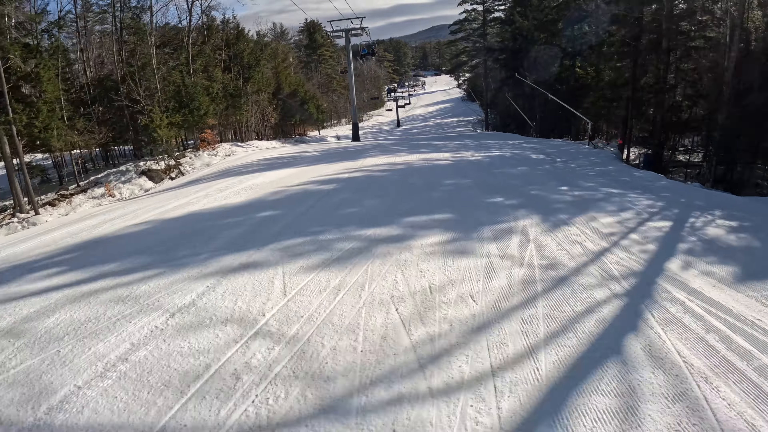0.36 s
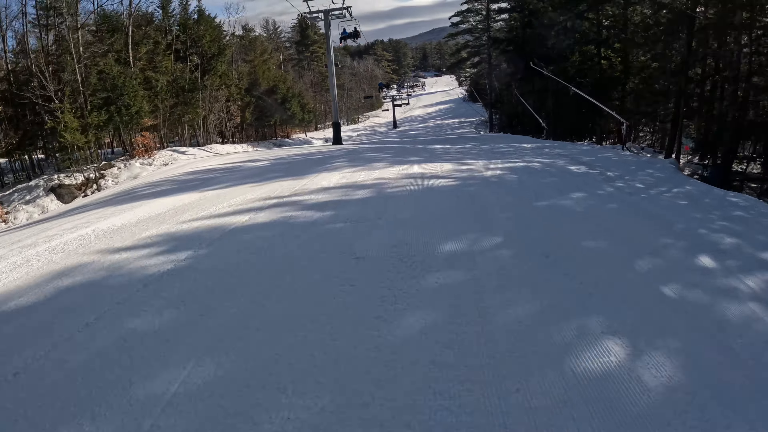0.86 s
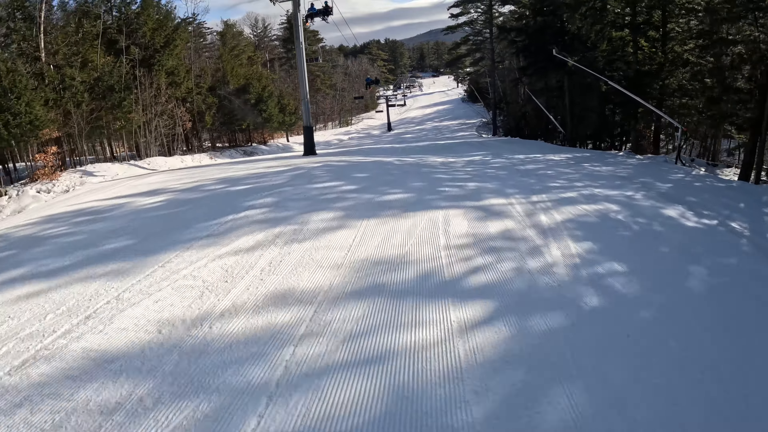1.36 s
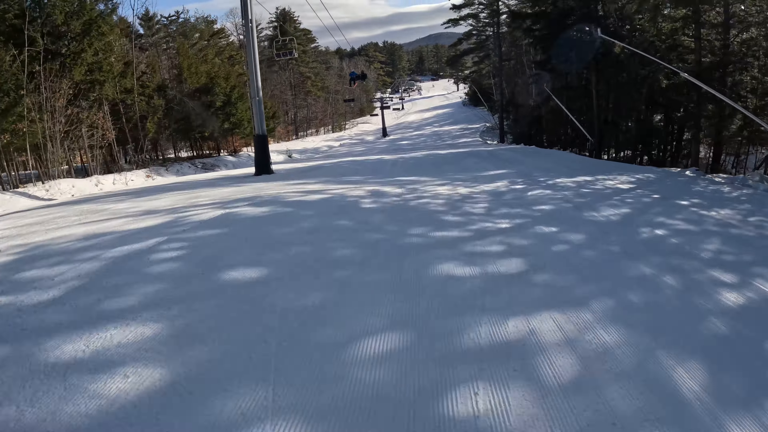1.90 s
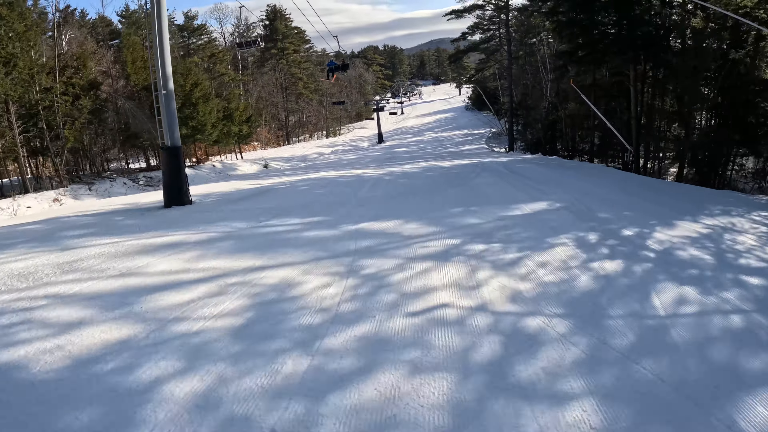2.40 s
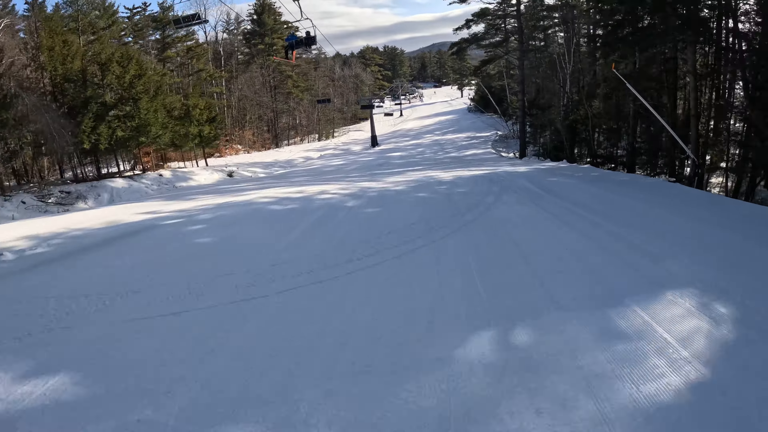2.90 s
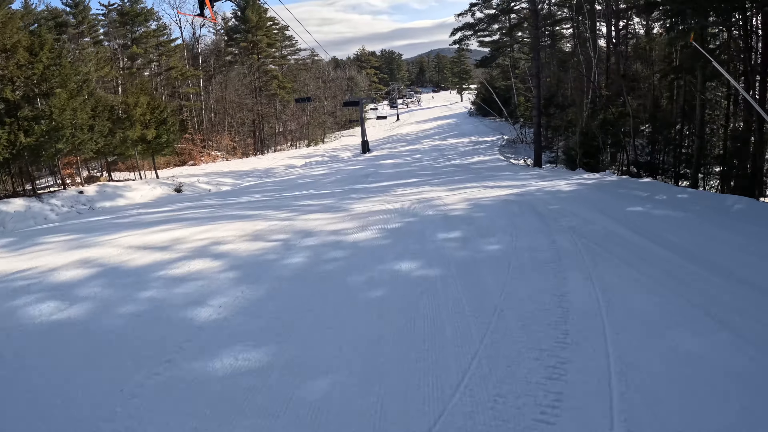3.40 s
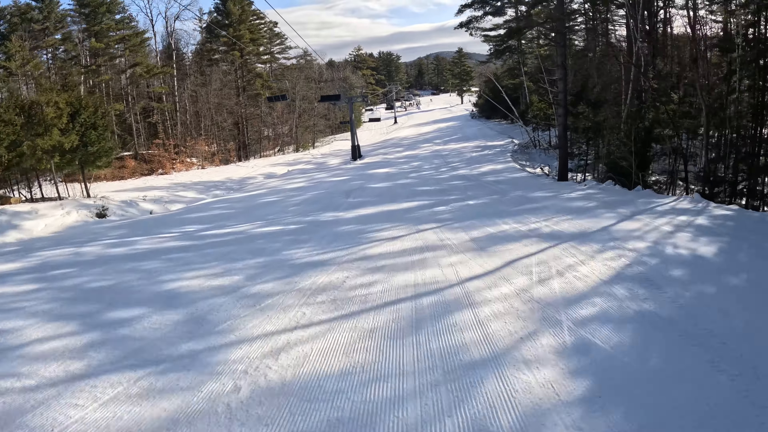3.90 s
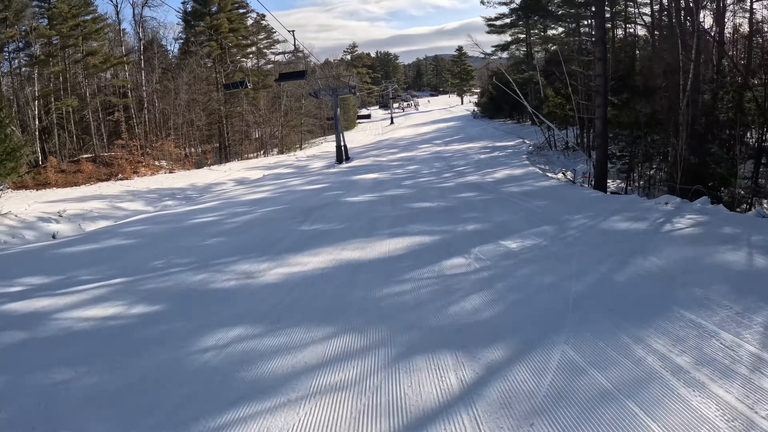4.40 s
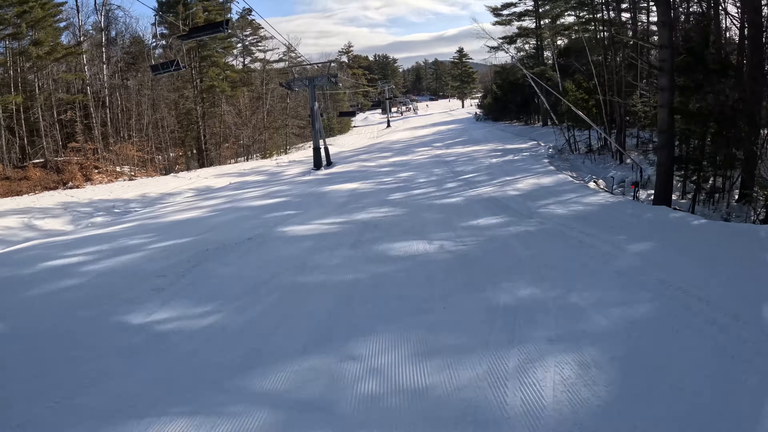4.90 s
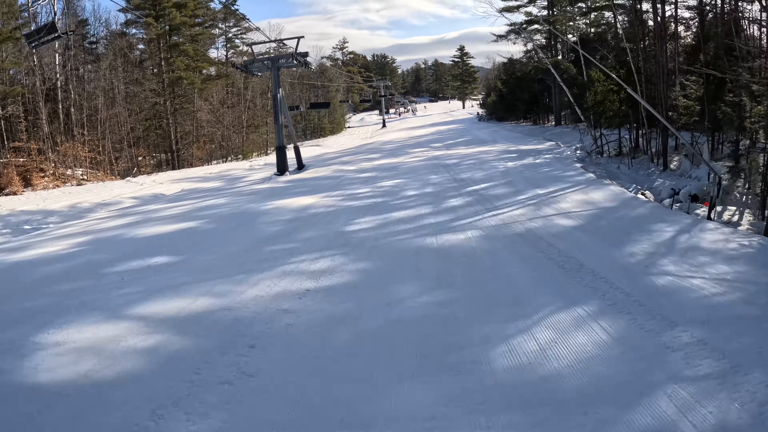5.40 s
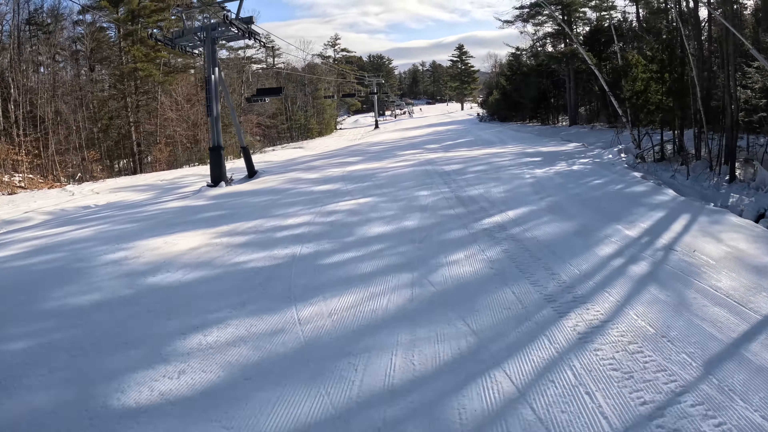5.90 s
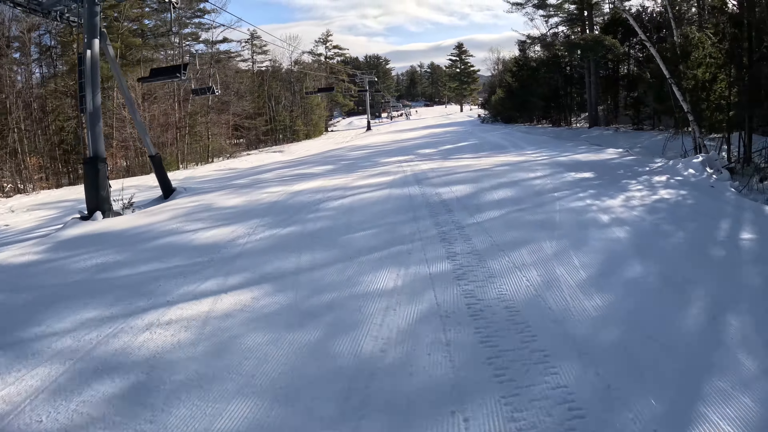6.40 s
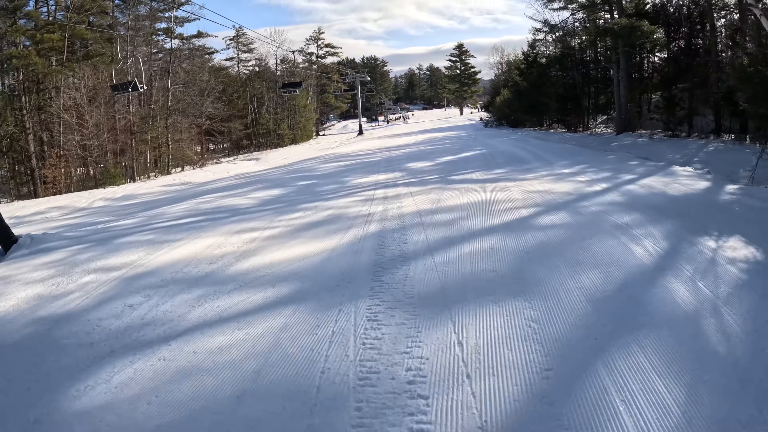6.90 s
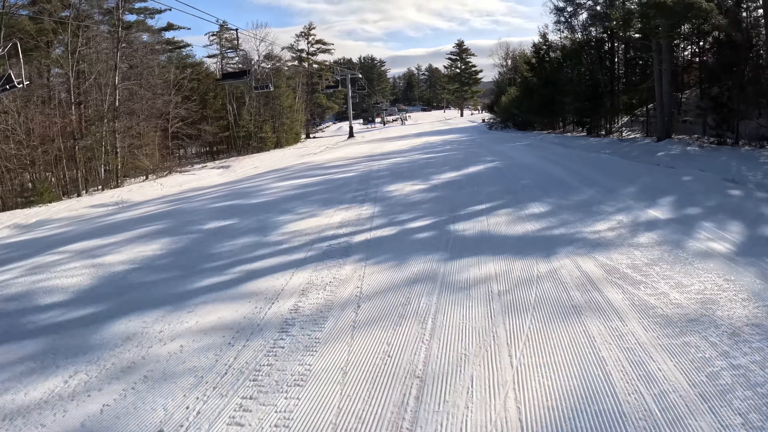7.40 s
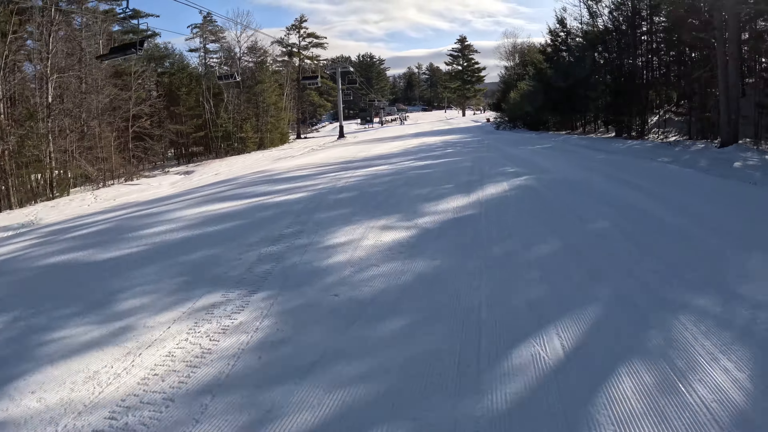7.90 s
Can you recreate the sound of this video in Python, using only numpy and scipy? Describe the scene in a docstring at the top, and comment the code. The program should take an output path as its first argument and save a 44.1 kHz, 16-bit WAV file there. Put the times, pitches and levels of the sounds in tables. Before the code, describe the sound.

Skis carve fast down firm groomed snow outdoors, heard from a microphone worn on the skier. A loud, bright grinding scrape opens, followed by several strong bites with little slaps and hissing spray. A longer scrape comes around three seconds, then the edgings grow softer while low wind thumps and flutters unevenly throughout.

```python
"""Carving skis in the wind

A skier carves down firm groomed snow with the microphone on the body.
The steel edges crush snow grains: random impulses ring the skis' resonances and make a filtered crunch.
Hissing spray is finer grain noise that partly follows the edges' judder; short bursts slap over ridges.
The airstream buffets the microphone: three bands of noise thump, flutter and rush, their levels shifted by gusts."""
import sys
import numpy as np
from scipy import signal
from scipy.fft import rfft, irfft, next_fast_len
from scipy.io import wavfile
from scipy.ndimage import uniform_filter1d

SR = 44100
rng = np.random.default_rng(int(sys.argv[2]) if len(sys.argv) > 2 else 0)


def gain_from_decibels(decibels):
    """Convert decibel values to linear amplitude factors."""
    exponent = np.asarray(decibels, float) / 20
    return 10 ** exponent


def bounce(signal):
    """Save signal as a 16-bit WAV file at the path given by the first command-line argument."""
    frames = np.transpose(np.atleast_2d(signal))
    limited = np.clip(frames, -1, 1)
    pcm = np.round(limited * 32767).astype(np.int16)
    wavfile.write(sys.argv[1], SR, pcm)


N = 354119  # samples

# the snow under the skis: start_s, iciness as upper against lower scrape_db, loose powder as extra spray_db
SNOW = [(0, 11, 2.5), (.6, 6, 3), (1.0, 3, 1), (1.6, -3, -0.5), (2.1, 2, -1.5), (2.6, -5, 0.1),
        (3.0, -1, 2), (3.4, 1, 2.5), (4, 7, 1), (4.6, -0.5, -1.5), (5.5, -4, -0.5), (6.2, 1, -1),
        (6.7, -9, 0), (7.3, 4, 0.5), (8.03, 2, 0.5)]


def carving():
    """The loaded edge grips and judders through the snow, scraping, slapping and throwing spray."""
    bite_db = edge_bite()
    ice_db, powder_db = in_time(SNOW)
    bite_swing_db = bite_db - bite_db.mean()
    # a loaded edge runs steadier: it loses this share of the judder per dB of bite
    looseness = np.clip(1.0 - 0.06 * bite_swing_db, .2, 1.5)
    judder_db = looseness * (0.7 * drift(37) + 1.04 * drift(45))
    grip = rms_one(gain_from_decibels(judder_db)) * gain_from_decibels(bite_db)
    body = scrape(looseness, ice_db)
    return grip * body + slaps(body) + spray(bite_swing_db, powder_db, judder_db)


# an edge is set and held: full_bite_s, hold_s, bite_db, build_db_per_s
EDGINGS = [(0.06, 0.27, -23.5, 47), (.5, 0.056, -35.5, 60), (0.837, 0.17, -29.5, 50),
           (1.073, 0.23, -25.5, 38), (1.414, 0.048, -39.5, 88), (2.054, 0.053, -40, 23),
           (2.2, 0.14, -35.5, 46), (2.585, 0.027, -33.5, 55), (2.993, 0.58, -33.5, 40),
           (4.266, 0.35, -38, 35), (4.683, 0.22, -34, 23), (4.946, 0.17, -36, 34), (5.294, 0.2, -41, 33),
           (5.877, 0.12, -42.5, 43), (6.24, 0.11, -41, 43), (6.828, 0.08, -39, 300),
           (7.343, 0.059, -37.5, 81), (7.63, 0.5, -37.5, 25)]
RELEASE_DB_PER_S = 64
GLIDE_DB = -42  # flat skis between edgings


def edge_bite():
    """Each edging builds, holds and is released; its power adds to that of the glide; dB."""
    t = np.arange(N) / SR
    power = gain_from_decibels(2 * GLIDE_DB)
    for full_s, hold_s, level_db, build in EDGINGS:
        building_db = build * np.maximum(full_s - t, 0)
        released_db = RELEASE_DB_PER_S * np.maximum(t - full_s - hold_s, 0)
        power = power + gain_from_decibels(2 * (level_db - building_db - released_db))
    return 10 * np.log10(power)


# spectrum of the crushed snow: pitch_hz, density_db (relative)
CRUNCH = [(500, -10.5), (900, -5), (1400, -8.5), (2500, -16), (3700, -19), (4400, -27.5), (6000, -53)]
# how freely the ski rings: start_s, shift of ringing against crunch_db
RINGING = [(0, 3.5), (.6, 0), (1.1, -0.5), (2.1, -3.5), (3.0, -3), (3.6, 1), (4.6, -0.5), (5.5, -6),
           (6.5, 3), (6.85, 2.5), (7.15, 0.5), (8.03, -6.5)]


def scrape(looseness, ice_db):
    """Breaking grains ring the ski and crunch; harder snow under the edge scrapes brighter."""
    ringing = rms_one(ski_ring(grains(3.8)))
    crunch = coloured(grains(3.1), CRUNCH) * rms_one(gain_from_decibels(0.93 * looseness * drift(19)))
    free_db, = in_time(RINGING)
    mix = gain_from_decibels(free_db / 2 - 3.5) * ringing + gain_from_decibels(-free_db / 2 - 1.5) * crunch
    return evened(tilted(mix, 2450, ice_db), 0.07, 0.1)


# what the skis ring with: pitch_hz, width_hz, level_db (relative)
SKI = [(1085, 45, 0.5), (1193, 42, 5), (1540, 68, -6.5), (1639, 37, 1), (1975, 91, -4.5), (2184, 156, -6.5),
       (2574, 174, -12.5), (2935, 130, -9.5), (3330, 230, -14.5), (3750, 300, -15), (5040, 250, -18.5)]
MODE_WANDER_DB = 1.3  # the contact moves along the edge and favours other modes


def ski_ring(force):
    """The ski's resonances in parallel, signs alternating, each driven more or less as the contact wanders."""
    out = np.zeros(N)
    for k, (hz, width, level_db) in enumerate(SKI):
        r = np.exp(-np.pi * width / SR)
        poles = [1, -2 * r * np.cos(2 * np.pi * hz / SR), r * r]
        zeros = [(1 - r * r) / 2, 0, (r * r - 1) / 2]  # about unity gain at the peak
        drive = force * rms_one(gain_from_decibels(MODE_WANDER_DB * drift(19)))
        out += (-1) ** k * gain_from_decibels(level_db) * signal.lfilter(zeros, poles, drive)
    return out


GRAINS_PER_S = 9000


def grains(spread_db):
    """Snow crystals break at random, most small and a few large."""
    sizes = gain_from_decibels(spread_db * np.minimum(rng.exponential(1, N), 5)) * rng.choice([-1, 1], N)
    return rms_one(sizes * (rng.random(N) < GRAINS_PER_S / SR))


# a ski slaps over a ridge: start_s, level_db (relative), brightness_db (added to the top, taken from the bottom)
SLAPS = [(0.439, -7, -2), (0.5112, -13, -8), (0.5354, -10, 2), (1.1797, -12.5, -14), (1.276, -19, -5),
         (1.3204, -19, 3), (1.41, -12, -8), (1.4525, -11, -8), (1.5574, -19, 12), (2.1894, -18, -12),
         (2.2228, -20.5, -13), (2.267, -16, -10), (2.4862, -17, 0), (2.6314, -20, 4), (2.6524, -20, -11),
         (2.8789, -14, -8), (3.004, -13, -2), (3.034, -9, -2), (3.1123, -15, 1), (3.175, -16, 7),
         (3.2236, -13, 0), (3.2585, -15, -2), (3.3994, -14, 7), (3.449, -26, 3), (3.5019, -18, 4),
         (3.5807, -23, 3), (4.6922, -18, -8), (4.7366, -21, 0), (5.05, -16, -11), (5.12, -17, 6),
         (6.665, -25, -10), (6.7507, -24, 4), (6.8034, -17, -7), (6.9706, -18, -6), (7.004, -23, -9),
         (7.11, -27, -10), (7.229, -15, 2), (7.32, -19, 2), (7.42, -15, -9), (7.436, -14, -1)]
SLAP_FALL_S = 0.0059
SLAP_SCRAPE_SHARE = 0.65  # scrape against the squall
KNOCK_DB = 15  # drive of the ringing against the squall


def slaps(body):
    """Each slap is a squall of scrape that also sets the ski ringing on; top and bottom have their own level."""
    start_s, level_db, bright_db = np.transpose(SLAPS)
    force = rng.standard_normal(N)
    out = 0
    # one band is inverted so that the two join smoothly at the crossover
    for side, sign in (("low", -1), ("high", 1)):
        squall = squalls(np.c_[start_s, level_db + sign * bright_db], SLAP_FALL_S)
        hit = SLAP_SCRAPE_SHARE * squall * body + gain_from_decibels(KNOCK_DB) * ski_ring(squall * force)
        out = out + sign * signal.sosfilt(signal.butter(2, 1900, side, fs=SR, output="sos"), hit)
    return out


# a clump of snow bursts into spray: start_s, level_db (relative)
SPURTS = [(0.4379, -37), (0.5756, -21), (0.7701, -32), (2.9382, -36), (3.2645, -27), (3.3747, -26),
          (4.7336, -32), (6.2482, -36), (6.5535, -30), (6.7506, -39), (7.2305, -35), (7.275, -34),
          (7.896, -43)]
SPURT_FALL_S = 0.012
FINE_SPURT_SHARE = .3  # how much of a spurt reaches the fine powder
PLUME_DB, PLUME_FOLLOWS_BITE = -48.5, 0.46  # level at mean bite before powder; share of the bite's swing
DUST_SWINGS_MORE = .25  # the fine powder's swing beyond the coarse spray's, as a share


def spray(bite_swing_db, powder_db, judder_db):
    """Thrown snow hisses more the harder the edge bites; clumps burst into it."""
    coarse_db = PLUME_DB + PLUME_FOLLOWS_BITE * bite_swing_db + powder_db
    fine_db = coarse_db + DUST_SWINGS_MORE * (coarse_db - coarse_db.mean())
    spurt = squalls(SPURTS, SPURT_FALL_S)
    coarse = spray_stream("low", judder_db)
    fine = spray_stream("high", judder_db)
    return (gain_from_decibels(coarse_db) + spurt) * coarse + (gain_from_decibels(fine_db) + FINE_SPURT_SHARE * spurt) * fine


# spectrum of the flying snow: pitch_hz, density_db (relative)
SPRAY = [(2500, -8.5), (4000, -4), (5600, -4.5), (7000, -13), (9000, -19), (11000, -25.5), (12400, -24),
         (13300, -53), (14400, -60)]


def spray_stream(side, judder_db):
    """Coarse clumps (low) or fine powder (high): grains that follow the judder in part and flicker by themselves."""
    stream = coloured(grains(0.78), SPRAY) * rms_one(gain_from_decibels(0.33 * judder_db + 1.0 * drift(25)))
    return signal.sosfilt(signal.butter(3, 6500, side, fs=SR, output="sos"), stream)


SQUALL_RISE_S = 0.0026
CREST_DB = 12  # taken off each listed level, as room for the noise's peaks above its rms


def squalls(events, fall_s):
    """Level curve of short squalls of extra noise: quick rise, slower fall."""
    start_s, level_db = np.transpose(events)
    marks = np.zeros(N)
    marks[(start_s * SR).astype(int)] = gain_from_decibels(level_db)
    t = np.arange(int(.06 * SR)) / SR
    envelope = (1 - np.exp(-t / SQUALL_RISE_S)) * np.exp(-t / fall_s)
    return gain_from_decibels(-CREST_DB) * signal.fftconvolve(marks, envelope)[:N]


# the airstream before gusts: start_s, rush_db, large eddies as swing of thump_db, middle eddies as flutter_db
AIRSTREAM = [(0, -23, -2.5, -24), (.6, -24.5, 2.5, -25), (1.0, -29.5, 1, -28.5), (1.5, -33.5, 2.5, -22),
             (1.8, -30.5, -5, -34.5), (2.4, -29, 0, -28), (2.9, -32.5, -2, -25.5), (3.25, -24.5, 0, -27.5),
             (3.7, -29, 2, -30), (4.15, -23, 2, -25.5), (4.7, -31, -2, -28.5), (5.15, -31.5, 1.5, -23),
             (5.5, -27.5, 2, -24), (5.9, -28, 2.5, -26), (6.5, -32, 1, -28), (6.85, -36, 2, -25),
             (7.15, -31.5, 5.5, -21.5), (7.5, -34.5, 0.5, -32), (7.9, -29, -0.5, -27),
             (8.03, -31, 3.5, -20.5)]
# the rush brightens and dulls: start_s, upper against lower part_db
RUSH_BRIGHTNESS = [(0, 16.5), (.3, 3), (.6, 3), (.85, 0), (1.2, -13.5), (2, 3), (2.9, -25), (3.5, 0.5),
                   (4, -7), (4.9, 4.5), (5.5, -2), (6.2, 0.5), (7.2, -2.5), (8.03, -11)]
# spectra of the thump, flutter and rush: pitch_hz, density_db (relative)
BUFFET = [(14, -56), (22, -5.5), (38, 0), (70, -2.5), (110, -6), (170, -16.5), (400, -46.5)]
FLUTTER = [(70, -14), (120, -2), (200, -3.5), (270, -6.5), (340, -12.5), (420, -25), (900, -61)]
RUSH = [(200, -23), (320, -2.5), (400, 0.5), (520, -2.5), (650, -5.5), (900, -11), (1400, -22), (3000, -38)]
THUMP_DB = -20  # before its swing and the gusts
# how strongly each size of eddy follows a gust's level before and after its break
THUMP_FEELS, FLUTTER_FEELS, RUSH_FEELS = (0.53, 0.66), (1.76, 0.9), (1, 0.6)


def wind():
    """Eddies of three sizes: the largest thump on the membrane, smaller ones flutter and rush in shared lumps."""
    rush_db, thump_swing_db, flutter_db = in_time(AIRSTREAM)
    brightness_db, = in_time(RUSH_BRIGHTNESS)
    thump_gust_db, flutter_gust_db, rush_gust_db = np.array([THUMP_FEELS, FLUTTER_FEELS, RUSH_FEELS]) @ gusts()
    lumps = drift(45)
    thump = evened(coloured(rng.standard_normal(N), BUFFET), 0.23, 0.51)
    flutter = coloured(rng.standard_normal(N), FLUTTER) * gain_from_decibels(2.3 * lumps)
    flutter = evened(flutter, 0.22, 0.43)
    rush = coloured(rng.standard_normal(N), RUSH) * gain_from_decibels(0.31 * lumps + 1.33 * drift(30))
    rush = evened(tilted(rush, 580, brightness_db), 0.037, 0.3)
    return (gain_from_decibels(THUMP_DB + thump_swing_db + thump_gust_db) * thump
            + gain_from_decibels(flutter_db + flutter_gust_db) * flutter
            + gain_from_decibels(rush_db + rush_gust_db) * rush)


# the wind's level shifts toward a break and after it: break_s, before_db, after_db (either sign)
GUSTS = [(.75, 1.5, -2.5), (.89, 2.5, 6), (1.12, -1, -3), (1.5, 0.5, 0.5), (1.72, 4.5, 5.5), (2.08, 3, 4),
         (3.55, 4.5, 3.5), (4.35, 4.5, 1), (4.62, 3.5, 5.5), (5.55, 2, -0.5), (6.33, 6.5, -3),
         (7.02, -1, -11.5), (7.36, 1.5, -4.5), (7.51, 7, 5), (7.95, 2.5, -3.5)]
BEFORE_S, AFTER_S = 0.11, 0.25  # reach of the two shifts


def gusts():
    """Each gust shifts the level up or down toward its break, then another shift fades; rows before and after, dB."""
    t = np.arange(N) / SR
    out = np.zeros((2, N))
    for break_s, before_db, after_db in GUSTS:
        out[0] += (t < break_s) * before_db * np.exp(-((break_s - t) / BEFORE_S) ** 2)
        out[1] += (t >= break_s) * after_db * np.exp(-((t - break_s) / AFTER_S) ** 2)
    return uniform_filter1d(out, int(0.013 * SR))  # softens the break


def rms_one(x):
    """Scale to rms 1."""
    return x / np.sqrt(np.mean(x ** 2) + 1e-20)


def in_time(rows):
    """Columns of a curve table, one value a sample."""
    start_s, *columns = np.transpose(rows)
    return [np.interp(np.arange(N) / SR, start_s, column) for column in columns]


def drift(rate_hz):
    """Slow chance of spread 1: noise twice through a one-pole low-pass, made at every 40th sample."""
    r = np.exp(-2 * np.pi * rate_hz * 40 / SR)
    noise = rng.standard_normal(N // 40 + 2002)
    slow = signal.lfilter([1], [1, -2 * r, r * r], noise)[2000:]  # skip the filter's start
    return np.interp(np.arange(N) / 40, np.arange(len(slow)), rms_one(slow))


def coloured(x, spectrum):
    """Give a signal a spectrum, drawn in dB over log frequency; rms 1."""
    size = next_fast_len(N)
    hz, db = np.transpose(spectrum)
    log_hz = np.log(np.fft.rfftfreq(size, 1 / SR) + 1)
    shape = gain_from_decibels(np.interp(log_hz, np.log(hz), db, left=-80, right=-80))
    return rms_one(irfft(rfft(x, size) * shape, size)[:N])


def evened(x, span_s, share):
    """Divide out a share of the level swings slower than the span; rms 1."""
    span = int(span_s * SR)
    power = uniform_filter1d(uniform_filter1d(x ** 2, span), span)
    return rms_one(x / (power + 1e-9) ** (np.clip(share, 0, 1) / 2))


def tilted(x, pivot_hz, tilt_db):
    """Raise what lies above the pivot against what lies below."""
    low = signal.sosfilt(signal.butter(2, pivot_hz, fs=SR, output="sos"), x)
    high = signal.sosfilt(signal.butter(2, pivot_hz, "high", fs=SR, output="sos"), x)
    return low * gain_from_decibels(-tilt_db / 2) - high * gain_from_decibels(tilt_db / 2)


def scene():
    """Skis and wind, heard at one microphone."""
    return (carving() + wind())[None]


def low_pass(x):
    """Removes everything above the highest recorded frequency."""
    return signal.sosfilt(signal.butter(12, 13850, fs=SR, output="sos"), x)


CUTOFF_HZ = 15500  # from here up the low-pass takes off at least 60 dB


def record(dry):
    """The loudest peaks are rounded off and the top is cut."""
    rounded = 0.69 * np.tanh(dry / 0.75)
    mix = signal.sosfilt(signal.cheby2(10, 60, CUTOFF_HZ, fs=SR, output="sos"), rounded)
    return low_pass(mix)


dry = scene()
out = record(dry)
bounce(out)
```